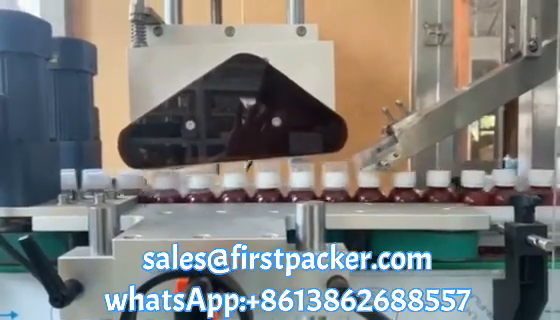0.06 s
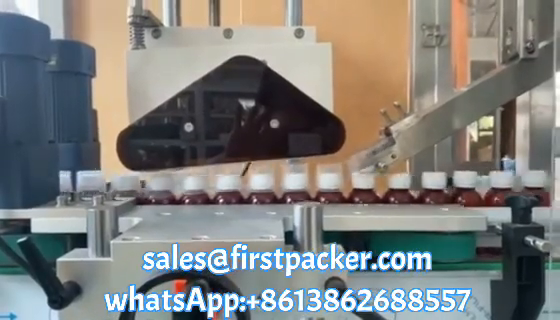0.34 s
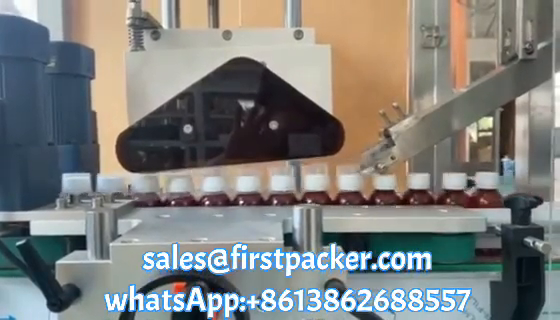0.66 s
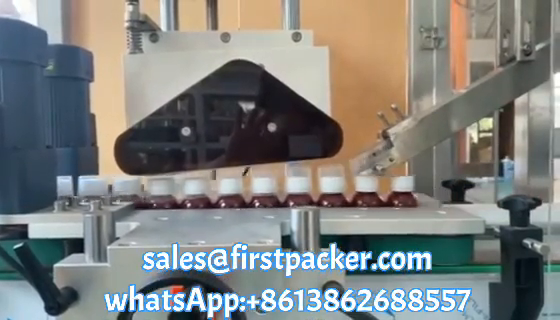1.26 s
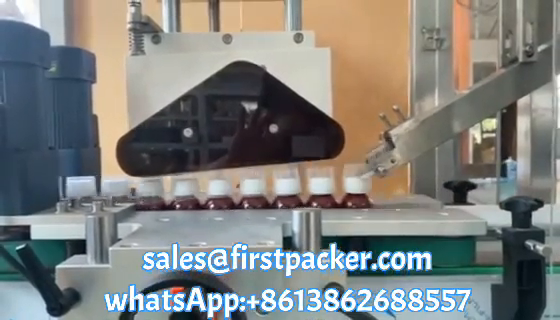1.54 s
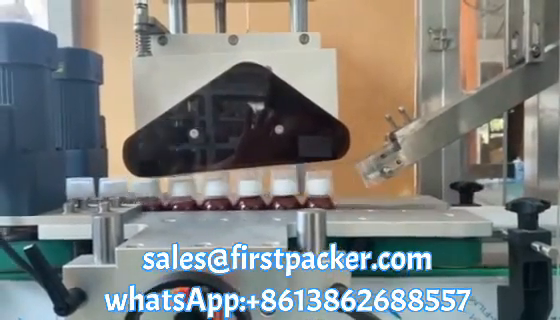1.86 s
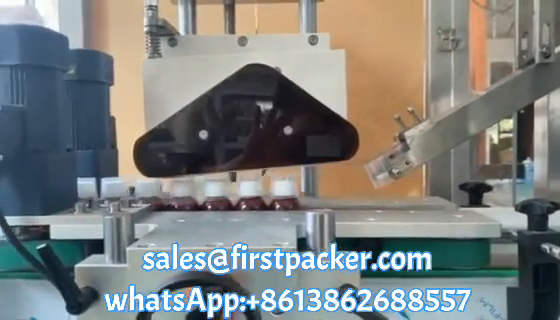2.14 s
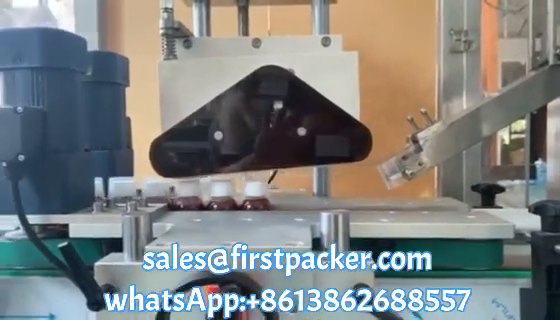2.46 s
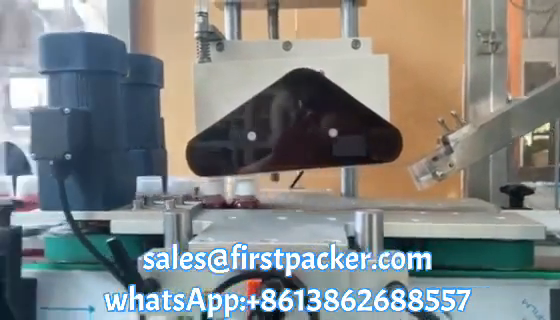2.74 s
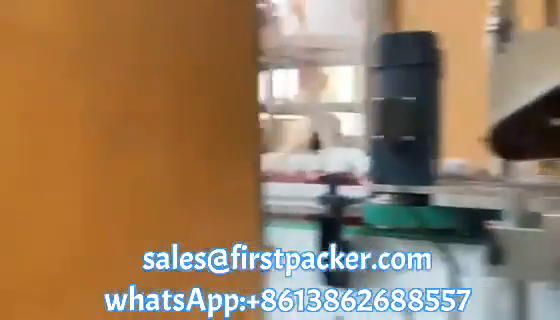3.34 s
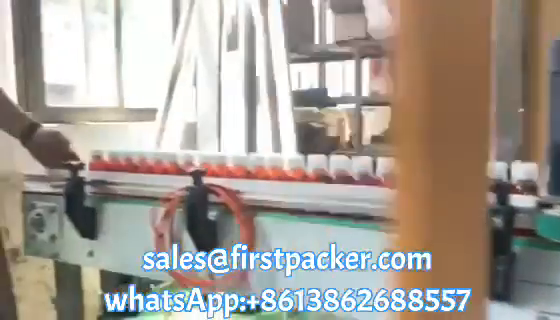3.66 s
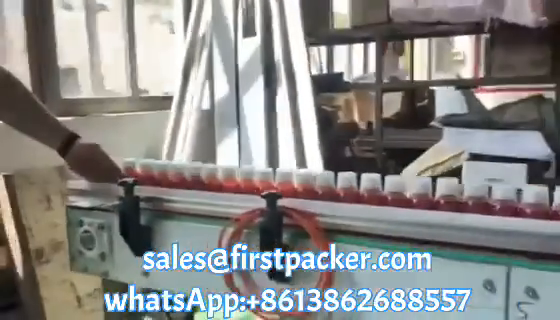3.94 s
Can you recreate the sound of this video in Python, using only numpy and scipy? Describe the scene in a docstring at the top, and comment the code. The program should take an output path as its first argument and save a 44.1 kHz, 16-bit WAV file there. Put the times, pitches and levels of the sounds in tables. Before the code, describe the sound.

A bottle capping machine runs, plastic caps rattling and clattering over droning motors and hiss.

```python
"""In a hard-walled factory, a bottle capping machine runs: geared motors drone over a steady hiss of air
and belts. Plastic caps rattle without pause, thousands of tiny hits a second. Now and then bottles and
caps clatter against each other and the steel guides, some blows ring on, and the frame booms briefly.
The hits echo off the walls. Near the end the microphone turns away from the rattle, which fades,
and toward the conveyor's whining gears."""
import sys
import numpy as np
from scipy import signal
from scipy.fft import rfft, irfft, next_fast_len
from scipy.io import wavfile
from scipy.ndimage import uniform_filter1d, map_coordinates

SR = 44100
rng = np.random.default_rng(int(sys.argv[2]) if len(sys.argv) > 2 else 0)


def materialize(psi):
    """Save the field psi as 16-bit PCM at rate SR to the path in sys.argv[1].

    A 1-D psi becomes a single channel; in a 2-D psi each row is a channel.
    """
    bounded = np.clip(np.atleast_2d(psi).T, -1, 1)
    quanta = np.round(bounded * 32767).astype(np.int16)
    wavfile.write(sys.argv[1], SR, quanta)


N = 176400


def amp(db):
    """Turn decibels into a number to multiply by."""
    return 10 ** (np.asarray(db) / 20)


def unit(x):
    """Scale a signal so that its average strength (rms) is 1."""
    return x / np.sqrt(np.mean(x ** 2) + 1e-20)


def along(points, hz):
    """Read between the rows of an (f/Hz, value) table, on a log frequency axis."""
    freqs, values = np.transpose(points)
    return np.interp(np.log(hz + 1), np.log(freqs + 1), values)


def clock():
    """The time of every sample, in seconds."""
    return np.arange(N) / SR


def curve(rows):
    """Join (t/s, value) points with straight lines."""
    return np.interp(clock(), *np.transpose(rows))


def wobble(per_s):
    """A smooth curve through per_s random values a second."""
    return map_coordinates(rng.standard_normal(1024), [clock() * per_s], mode="mirror")


def filtered(x, response):
    """Multiply each frequency in x by response(hz)."""
    size = next_fast_len(N + 8192)
    return irfft(rfft(x, size) * response(np.fft.rfftfreq(size, 1 / SR)), size)[..., :N]


def coloured(x, spectrum):
    """Give white noise or clicks the tone of an (f/Hz, level/dB) table, keeping their power."""
    size = 2048
    gain = unit(amp(along(spectrum, np.fft.rfftfreq(size, 1 / SR))))
    # minimum phase: the ringing comes after each click, never before it
    fold = np.r_[1, np.full(size // 2 - 1, 2), 1, np.zeros(size // 2 - 1)]
    cepstrum = irfft(np.log(gain + 1e-6))
    ring = irfft(np.exp(rfft(cepstrum * fold)))
    return signal.fftconvolve(x, ring[None], axes=1)[:, :N]


def waver(hz, width_hz):
    """An unsteady tone of strength 1, smeared over nearby pitches."""
    phase = 2 * np.pi * hz * clock()
    return unit(wobble(2 * width_hz) * np.cos(phase) + wobble(2 * width_hz) * np.sin(phase))


def motors():
    """The motors rumble, and they and their gears hum with wavering tones."""
    # the low drone's loudness over time: t/s, relative level/dB
    drone = [(0, -35.5), (.43, -32.3), (1.51, -36), (2.16, -34.7), (3.13, -34.5), (3.26, -37.5), (4, -39)]
    # the rumble's tone: f/Hz, relative level/dB
    spectrum = [(20, -17), (38, -19), (55, -9.5), (85, -4.5), (120, -2), (160, 1), (220, 0), (280, -5),
                (390, -1.5), (480, -6.5), (650, -5.5), (1000, -11), (2000, -45)]
    # motor and gear tones: f/Hz, level/dB, width/Hz
    tones = [(66, -40, 8), (199, -47, 10), (392, -49, 12), (527, -50, 14), (744, -53, 20), (793, -53, 4),
             (895, -52, 30), (3900, -57, 12), (4077, -54.5, 12), (4436, -53.5, 16), (8000, -56, 4)]
    rumble = unit(coloured(rng.standard_normal((2, N)), spectrum))
    rumble *= amp(curve(drone) + 1.5 + 1.3 * wobble(14))
    hum = sum(amp(db) * np.array([waver(hz, width), waver(hz, width)]) for hz, db, width in tones)
    return rumble + hum


def patchy(x, depth_db):
    """Make a sound uneven: small patches of time and pitch get louder or softer at random."""
    slices = signal.stft(x, nperseg=512)[2]
    patches = uniform_filter1d(rng.standard_normal(slices.shape[1:]), size=3, axis=0)
    patches = uniform_filter1d(patches, size=5, axis=1)
    return signal.istft(slices * amp(depth_db * unit(patches)), nperseg=512)[1][:, :N]


def hiss():
    """Air and belts make a rushing noise that flutters slightly."""
    # the hiss's tone: f/Hz, relative level/dB
    spectrum = [(300, -31.5), (650, -15), (850, -10), (1200, -6), (1600, -5), (2050, -1), (2400, -5.5),
                (2900, -11.5), (3700, -12.5), (4300, -11), (5700, -15.5), (7000, -10), (9500, -13.5),
                (13000, -12), (15500, -24)]
    level_db = -30.5 + 0.043 * wobble(5.9) + .5 * wobble(17)
    noise = patchy(rng.standard_normal((2, N)), depth_db=2.5)
    return amp(level_db) * unit(coloured(noise, spectrum))


def contacts(per_s, spread_db):
    """Tiny hits of uneven size at random moments; overall strength 1."""
    hit = rng.random(N) < per_s / SR
    size = amp(spread_db * np.clip(rng.standard_normal(N), -2, 2))
    return unit(hit * size * rng.standard_normal((2, N)))


def clinks(per_s, centre_hz, scatter, t60, count=700):
    """Small parts ring, each at its own pitch, fading by 60 dB in t60 seconds; overall strength 1."""
    out, t = np.zeros((2, N + SR)), np.arange(SR // 10) / SR
    starts = np.cumsum(rng.exponential(size=count)) / per_s
    for start, (pitch, size, angle) in zip(starts, rng.standard_normal((count, 3))):
        if start < N / SR:
            hz = centre_hz * np.exp(scatter * np.clip(pitch, -2, 2))
            ring = amp(2 * np.clip(size, -2, 2) - 60 * t / t60) * np.sin(2 * np.pi * hz * t)
            channel_gains = [np.cos(np.pi * angle), np.sin(np.pi * angle)]
            first = int(start * SR)
            out[:, first:first + len(t)] += np.outer(channel_gains, ring)
    return unit(out[:, :N])


def caps():
    """Hollow plastic caps rattle in time with the machine's beat, among clinks and bright tinkles."""
    # the caps' loudness over time: t/s, level/dB
    loudness = [(0, -34), (.32, -33.5), (.42, -30), (.66, -30.5), (.88, -30), (1.16, -32), (1.46, -29.5),
                (1.6, -31.5), (1.72, -28), (1.81, -32), (2.03, -34), (2.15, -31), (2.35, -33), (2.6, -30.5),
                (2.86, -35), (2.95, -29.5), (3.08, -35.5), (3.42, -40), (4, -41)]
    # the tone of hollow plastic: f/Hz, relative level/dB
    spectrum = [(300, -30), (700, -2), (950, 2.5), (1200, 4), (1600, 0.5), (1950, 7.5), (2400, 3),
                (3000, -3.5), (4200, -9.5), (6000, -11.5), (10000, -16), (15000, -31)]
    shake_hz, shake_db = 20, 2.2
    beat = np.cos(2 * np.pi * shake_hz * (clock() - .025) + .3 * wobble(1.87))
    pulse = amp(shake_db * beat + 1.1 * wobble(25.25))
    rattle = coloured(pulse * contacts(per_s=4000, spread_db=1.5), spectrum)
    hollow = amp(-6) * clinks(per_s=110, centre_hz=1905, scatter=0.17, t60=.075)
    bright = amp(-17) * clinks(per_s=130, centre_hz=4920, scatter=0.3, t60=.055)
    return amp(curve(loudness)) * (rattle + hollow + bright)


def clatter():
    """Bottles and caps collide in tight bursts of hits, sounding a hollow body, a rim and a sharp tick."""
    # the bursts: t/s, length/s, then relative levels: body/dB, rim/dB, tick/dB
    bursts = [(0.119, 0.019, -19.5, -23.5, -34), (0.135, 0.016, -21.5, -29.5, -34),
              (0.177, 0.015, -23, -21.5, -25), (0.353, 0.01, -25.5, -25, -28),
              (0.365, 0.011, -19, -21.5, -27.5), (0.39, 0.027, -25.5, -25, -42),
              (0.416, 0.019, -25, -31, -29.5), (0.469, 0.016, -23, -24.5, -32),
              (0.565, 0.04, -22, -26, -41), (0.62, 0.0074, -26, -37, -45), (0.637, 0.011, -22, -24, -30.5),
              (0.665, 0.019, -25.5, -25, -37), (0.788, 0.005, -23.5, -24, -43),
              (0.814, 0.0043, -21, -27, -39), (0.825, 0.0067, -17.5, -24.5, -31),
              (0.891, 0.0053, -27, -24, -32), (0.953, 0.005, -39, -39, -29),
              (0.975, 0.0039, -29, -24.5, -41), (1.016, 0.0079, -23, -24, -37),
              (1.06, 0.009, -28, -28.5, -41), (1.117, 0.012, -42, -46, -29), (1.247, 0.017, -24, -24, -38),
              (1.305, 0.0096, -21.5, -25.5, -33), (1.32, 0.0072, -23, -42, -41),
              (1.37, 0.01, -19, -40, -26), (1.434, 0.017, -39, -30, -49), (1.546, 0.0073, -22, -25, -31),
              (1.557, 0.016, -19.5, -29, -29), (1.612, 0.02, -24, -33, -34), (2.066, 0.015, -27, -23, -32),
              (2.291, 0.0089, -25.5, -31, -46), (2.407, 0.054, -29, -30.5, -42),
              (2.51, 0.025, -25, -31, -40), (2.538, 0.035, -21, -23, -31), (2.587, 0.032, -27, -28, -36),
              (2.674, 0.02, -22.5, -25.5, -34)]
    # the tones of body, rim and tick, each: f/Hz, relative level/dB
    body = [(300, -14), (950, -11.5), (1300, -1), (1900, -0.5), (2400, -9), (3000, -37), (6000, -35)]
    rim = [(1200, -67.5), (2300, 10), (2750, 3), (3400, 1.5), (4200, -4), (5400, -6.5), (7500, -38.5)]
    tick = [(3000, -67), (5200, -12), (6500, 4.5), (9300, 3), (11000, -2), (16000, -42)]
    t, power, release_t60 = clock(), np.zeros((3, N)), 0.086
    for start, length, body_db, rim_db, tick_db in bursts:
        span = slice(max(0, int((start - .03) * SR)), int((start + .2) * SR))
        age = t[span] - start
        # long, dull bursts swell; short, bright ones snap
        rise_s = 0.12 * length * np.clip(amp(body_db - tick_db), .5, 5)
        swell = np.clip(1 + age / rise_s, 0, 1)
        fade = amp(-60 * np.maximum(age - length, 0) / release_t60)
        power[:, span] += (amp([[body_db], [rim_db], [tick_db]]) * swell * fade) ** 2
    parts = [coloured(strength * contacts(per_s=10000, spread_db=4.5), spectrum)
             for strength, spectrum in zip(np.sqrt(power), (body, rim, tick))]
    return amp(-2.5) * sum(parts)


def guides():
    """Some blows leave a cap or a steel guide ringing on one note."""
    # the ringing notes: t/s, f/Hz, level/dB, time to fade by 60 dB/s
    rings = [(0.136, 1370, -14, 0.05), (.372, 1207, -14.5, 0.06), (.828, 1575, -13, 0.06),
             (.828, 2100, -13, 0.05), (1.063, 1166, -17, 0.09), (1.44, 2178, -21, 0.13),
             (2.073, 1410, -16, 0.19), (2.42, 2330, -20, .09)]
    out, rise_s = np.zeros((2, N)), 0.0011
    for start, hz, db, t60 in rings:
        age = np.maximum(clock() - start, 0)
        strength = amp(db - 60 * age / t60) * (1 - np.exp(-age / rise_s))
        out += strength * np.sin(2 * np.pi * hz * age + [[0], [np.pi / 2]])
    return out


def frame():
    """The machine's frame booms at its natural pitches in short, blurred swells."""
    # the booms: t/s, length/s, level/dB, f/Hz
    booms = [(0.164, 0.057, -36, 541), (1.094, 0.1, -38.5, 526), (1.082, .1, -36.5, 385),
             (2.093, 0.092, -35.5, 380), (2.21, 0.06, -34, 208.6), (2.91, 0.15, -35.5, 394.5),
             (3.21, 0.08, -34.5, 520), (3.29, 0.14, -37.5, 555), (3.45, 0.09, -36, 555)]
    out, width_hz = np.zeros((2, N)), 55
    for start, length, db, hz in booms:
        swell = np.sin(np.pi * np.clip((clock() - start) / length, 0, 1)) ** .5
        out += amp(db) * swell * np.array([waver(hz, width_hz), waver(hz, width_hz)])
    return out


def clacks():
    """A cap strikes steel and bounces once; each hit cracks and rings the steel, slightly out of tune."""
    # the strikes: t/s, level/dB
    strikes = [(.181, -17.5), (.423, -20), (.889, -22), (1.122, -20), (1.371, -12), (1.614, -9.5)]
    # the steel's natural notes: f/Hz, relative level/dB, time to fade by 60 dB/s
    steel = [(2740, -3, .04), (3050, -8, .025), (3900, -11, .03), (6000, -17, .035), (7170, -13, .04)]
    # the crack's tone: f/Hz, relative level/dB
    crack_spectrum = [(700, -20), (1700, -2), (2600, 1), (4300, -3), (5500, -6), (8000, -2), (11000, -4),
                      (16000, -12)]
    bounce_s, bounce_db, crack_db, crack_t60 = .0065, -1.5, -5.5, .03
    rings, cracks, t = np.zeros((2, N)), np.zeros((2, N)), np.arange(SR // 8) / SR
    for when, db in strikes:
        for start, level_db in ((when, db), (when + bounce_s, db + bounce_db)):
            span = slice(int(start * SR), int(start * SR) + len(t))
            for hz, note_db, t60 in steel:
                detuned_hz = hz * (1 + .025 * rng.uniform(-1.15, 1))
                phase = 2 * np.pi * (detuned_hz * t + rng.random()) + [[0], [np.pi / 2]]
                rings[:, span] += amp(level_db + note_db - 60 * t / t60) * np.sin(phase)
            noise = rng.standard_normal((2, len(t)))
            cracks[:, span] += amp(level_db + crack_db - 60 * t / crack_t60) * noise
    return rings + coloured(cracks, crack_spectrum)


def whine():
    """The conveyor's gears sing out as the microphone turns toward them."""
    # the gears' tones: f/Hz, level/dB
    tones = [(791, -51), (4100, -49.5)]
    turn_start_s, turn_length_s, waver_radians = 3.06, 0.23, .7
    out = np.zeros((2, N))
    for hz, db in tones:
        drift = waver_radians * np.array([wobble(20), wobble(16)])
        out += amp(db) * np.sin(2 * np.pi * hz * clock() + drift)
    return out * np.clip((clock() - turn_start_s) / turn_length_s, 0, 1)


def hall(x):
    """The factory's diffuse echo off hard walls; high notes die first."""
    # how long the echo lasts: f/Hz, time to fade by 60 dB/s
    fade_times = [(200, 0.94), (2000, 0.94), (10000, 0.053)]
    out, step = np.zeros((2, N + SR)), SR // 10
    for first in range(0, N, step):  # a fresh tail every 0.1 s keeps steady tones out of the echo
        hz, t, noise = signal.stft(rng.standard_normal((2, SR // 3)), SR, nperseg=256)
        fade = amp(-60 * t / along(fade_times, hz)[:, None])
        tail = signal.istft(noise * fade, SR, nperseg=256)[1]
        echo = signal.fftconvolve(x[:, first:first + step], tail / np.linalg.norm(tail[0]), axes=1)
        out[:, first:first + echo.shape[1]] += echo
    return out[:, :N]


def spread(pair):
    """Blend two unrelated signals into left and right, as alike as they are in the hall."""
    # how alike the two sides are: f/Hz, likeness (0 unrelated, 1 the same)
    likeness = [(100, 0.97), (280, 0.91), (450, 0.68), (650, 0.0091), (1400, 0.039), (2000, 0.54),
                (2900, 0.51), (4300, 0.72), (5700, 0.51)]
    angle = lambda hz: np.arccos(np.clip(along(likeness, hz), -1, 1)) / 2
    mid, side = filtered(pair, lambda hz: np.array([np.cos(angle(hz)), np.sin(angle(hz))]))
    return np.array([mid + side, mid - side])


def scene():
    """The hits, their echo and the running machine, each pitch leaning a little left or right."""
    # the lean to one side: f/Hz, left minus right level/dB
    lean = [(300, 0.7), (530, -3), (780, 2.5), (1150, -2.2), (2000, 0), (3300, 1.5), (5100, 3.5),
            (6300, -2)]
    hits = caps() + clatter() + clacks() + guides()
    stereo = spread(hits + amp(-10) * hall(hits) + motors() + whine() + frame() + hiss())
    return filtered(stereo, lambda hz: amp(along(lean, hz) * np.array([[.5], [-.5]])))


def record(dry):
    """The recorder feeds the left treble to both sides, the right slightly early, and cuts off the top."""
    treble_hz, top_hz = 6300, 15850
    lead_s, in_phase_hz = .00025, 7000
    low = filtered(dry, lambda hz: hz < treble_hz)
    lead = lambda hz: np.exp(1j * np.pi * (hz - in_phase_hz) * lead_s * np.array([[-1], [1]]))
    treble = filtered(dry[0], lambda hz: (hz >= treble_hz) * lead(hz))
    return filtered(low + treble, lambda hz: hz < top_hz)


dry = scene()
out = record(dry)
materialize(out)
```